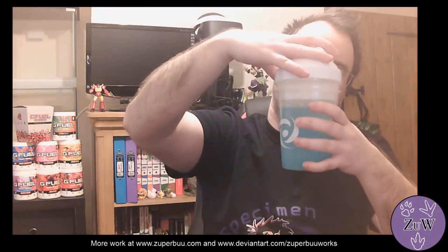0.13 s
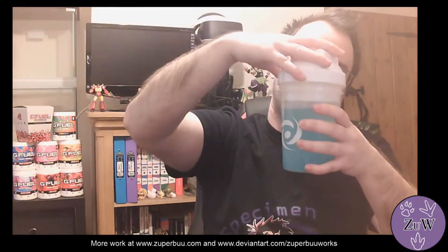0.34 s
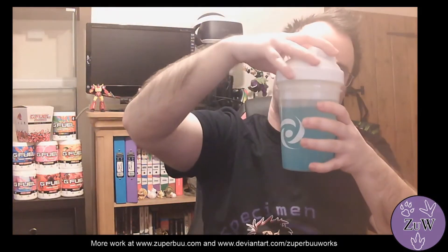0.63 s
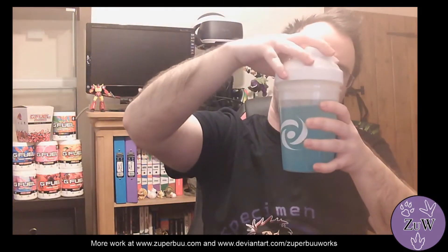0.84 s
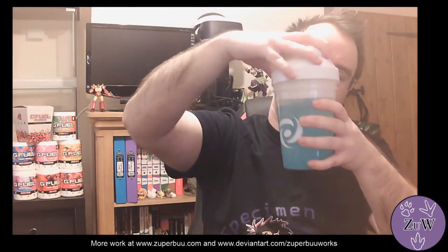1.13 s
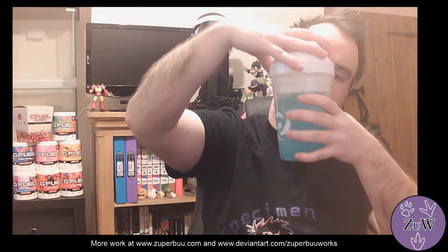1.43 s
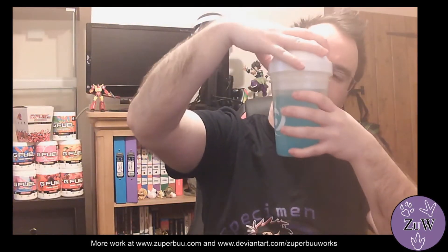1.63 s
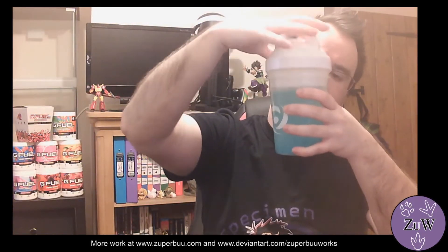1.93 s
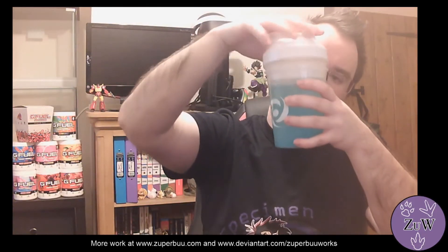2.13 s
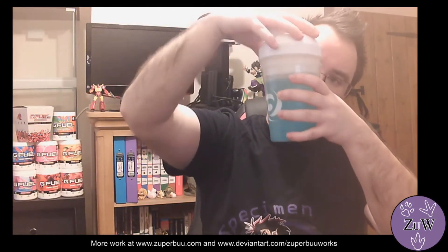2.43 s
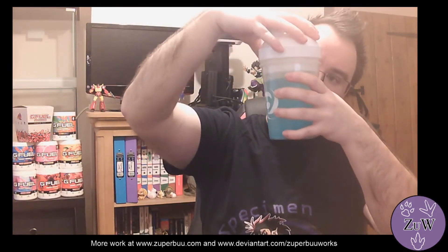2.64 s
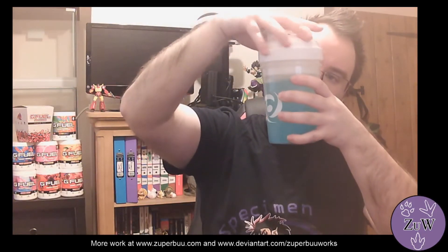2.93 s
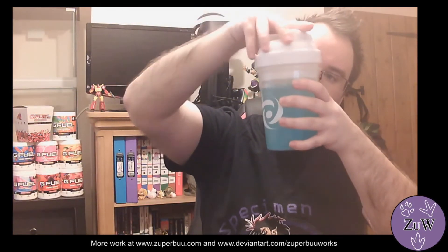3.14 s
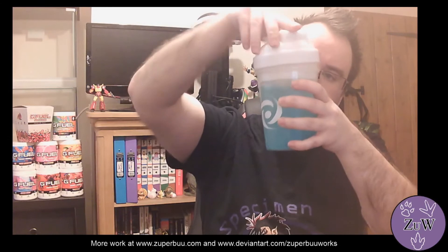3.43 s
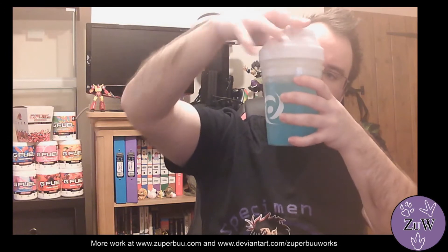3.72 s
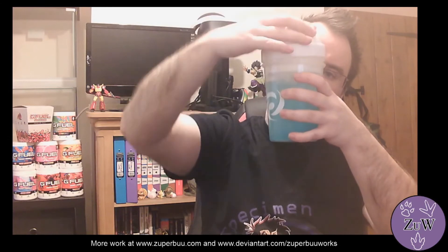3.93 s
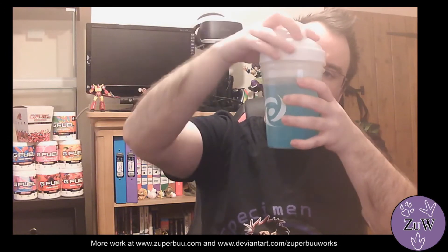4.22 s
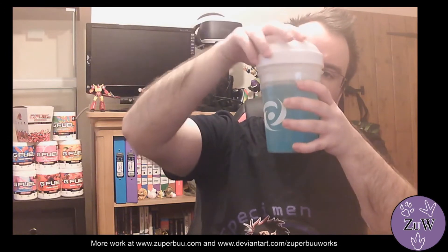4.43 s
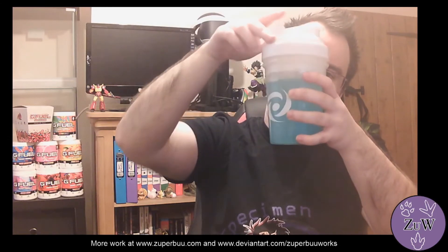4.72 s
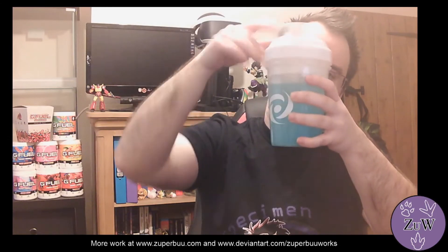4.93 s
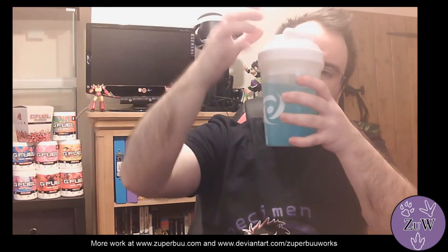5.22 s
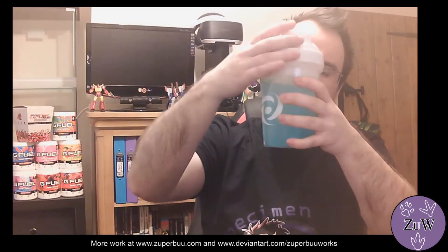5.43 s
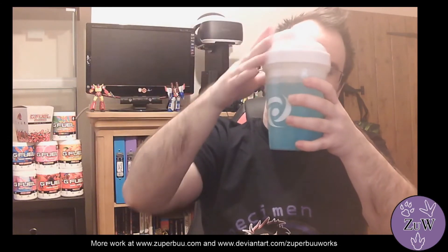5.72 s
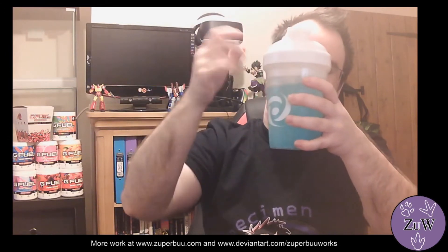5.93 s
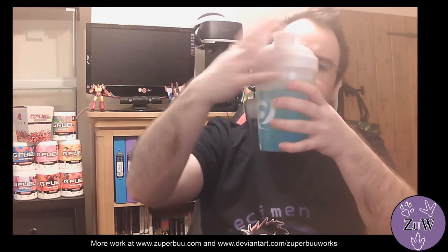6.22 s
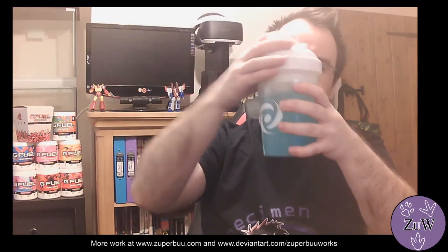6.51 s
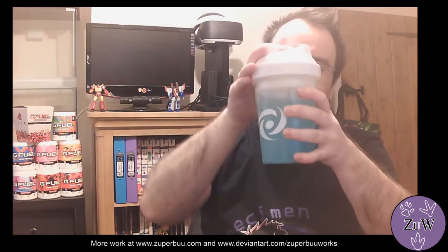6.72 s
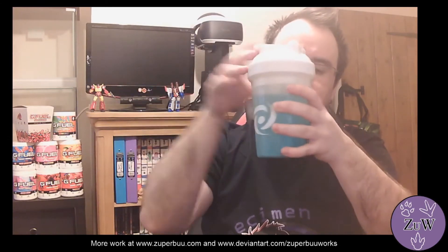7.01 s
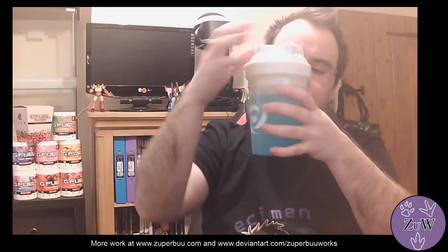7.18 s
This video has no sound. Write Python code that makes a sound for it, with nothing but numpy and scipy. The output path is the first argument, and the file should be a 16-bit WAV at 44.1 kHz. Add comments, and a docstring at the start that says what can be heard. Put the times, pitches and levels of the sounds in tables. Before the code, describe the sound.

Fingers press, tap and rub the lid of a filled plastic shaker cup, giving muffled hollow knocks and short rasps over a low pulsing hum.

```python
"""A hand presses, taps and rubs the lid of a filled plastic shaker cup held up in a small room.
From the start, knocks ring the cup's resonances and die away in the room, over a low hum of short tone
swells, soft tones, wavering resonant noise, a rumble and a faint rustle of the grip. A few fine ticks fall
early, midway and near the end; from about 2 s fingers rasp by stick-slip clicks, with thin squeaks of narrow
noise at 5 and 5.8 s. Most of it is muffled, with a thin sheen near 10 kHz on knocks and rubs."""
import sys
import numpy as np
from scipy import signal
from scipy.fft import rfft, irfft
from scipy.io import wavfile
from scipy.ndimage import uniform_filter1d

SR = 44100
rng = np.random.default_rng(int(sys.argv[2]) if len(sys.argv) > 2 else 0)


def int16_out(signal):
    """Quantize to a 16-bit WAV file."""
    q = np.round(np.clip(np.atleast_2d(signal).T, -1, 1) * 32767)
    wavfile.write(sys.argv[1], SR, q.astype(np.int16))


N = 324135
TIME = np.arange(N) / SR

# resonances of cup and lid: f/Hz, width/Hz, nominal level/dB
SHELL = [(97, 42, 4), (249, 100, 4), (345, 55, -12.5), (665, 22, 0.5), (713, 22, -9), (710, 110, 3),
         (797, 220, -3.5), (956.5, 130, 4.5), (979, 240, 2), (1204, 23, 0.5), (1080, 67, -5.5),
         (1262, 34, 0), (1399, 130, 2), (1658, 73, -5.5), (1610, 53, -8), (1960, 170, 2),
         (2300, 370, -12.5), (2230, 21, -7.5), (2710, 210, -11.5), (3130, 220, -11.5), (3280, 170, -13.5),
         (3410, 140, -13.5), (3660, 300, -13.5), (4100, 47, -23), (4200, 41, -18.5), (4360, 300, -19.5),
         (4830, 120, -22), (9800, 46, -16), (9500, 87, -25), (10126, 150, -17.5), (9990, 380, -16.5)]
# swells of the low hum: start t/s, length/s, level before gain/dB, mean f/Hz
SWELLS = [(0.044, 0.051, -44, 191.8), (0.122, 0.06, -40.5, 196), (0.234, 0.033, -43, 216.6),
          (0.278, 0.038, -37.5, 200), (0.526, 0.071, -48, 198.9), (0.626, 0.054, -37.5, 196.8),
          (0.856, 0.056, -38, 200.6), (0.908, 0.04, -38.5, 201.8), (0.951, 0.052, -38.5, 204.3),
          (1.011, 0.052, -46.5, 196.9), (1.122, 0.084, -44.5, 202.8), (1.204, 0.051, -50, 208),
          (1.345, 0.043, -47.5, 195.5), (1.373, 0.035, -48, 196.5), (1.463, 0.048, -53.5, 200.4),
          (1.524, 0.064, -40.5, 210.2), (1.876, 0.033, -41, 231.2), (1.971, 0.041, -50.5, 202.9),
          (2.007, 0.041, -40.5, 191.4), (2.045, 0.058, -46, 199.2), (2.28, 0.051, -35, 192.5),
          (2.4, 0.038, -39, 212.1), (2.428, 0.039, -35, 186.8), (2.504, 0.039, -33.5, 207.4),
          (2.542, 0.034, -39, 217.2), (2.594, 0.097, -35.5, 194.8), (2.845, 0.043, -47, 204.4),
          (2.88, 0.035, -37.5, 200.2), (2.94, 0.056, -40, 193.2), (2.995, 0.035, -46, 221),
          (3.065, 0.053, -33, 201.2), (3.105, 0.049, -37.5, 197.4), (3.165, 0.028, -38.5, 181),
          (3.29, 0.05, -38, 192.2), (3.378, 0.031, -40.5, 194.7), (3.439, 0.035, -39, 195),
          (3.626, 0.092, -36, 191.3), (3.725, 0.039, -44, 189.7), (3.8, 0.079, -43, 193),
          (3.865, 0.06, -40.5, 197.6), (3.915, 0.034, -47.5, 238.8), (3.937, 0.065, -52, 236),
          (4.04, 0.055, -38.5, 191), (4.153, 0.046, -40, 192.7), (4.173, 0.051, -38.5, 189.9),
          (4.217, 0.063, -39, 192.4), (4.275, 0.059, -39.5, 196.9), (4.358, 0.11, -35.5, 198.6),
          (4.419, 0.067, -37, 199), (4.487, 0.061, -50, 201.2), (4.578, 0.027, -45.5, 191.6),
          (4.613, 0.035, -39.5, 207.5), (4.641, 0.087, -48, 198.3), (4.728, 0.054, -46, 193.2),
          (4.806, 0.054, -53, 214.2), (4.88, 0.044, -48.5, 198.5), (4.922, 0.04, -51, 216),
          (4.979, 0.046, -45.5, 198.9), (5.077, 0.033, -37, 199.4), (5.093, 0.039, -46.5, 202),
          (5.153, 0.038, -38.5, 195.5), (5.178, 0.054, -48.5, 217.6), (5.35, 0.046, -41, 199),
          (5.392, 0.057, -37, 200.2), (5.445, 0.04, -48, 190), (5.706, 0.076, -47, 192.6),
          (5.768, 0.038, -39.5, 197.6), (5.81, 0.033, -40, 224.7), (5.84, 0.04, -45, 191.6),
          (5.862, 0.046, -51.5, 195.6), (5.929, 0.079, -39.5, 199.1), (6.074, 0.037, -41, 193.9),
          (6.156, 0.087, -39, 196.4), (6.226, 0.068, -39, 206.2), (6.301, 0.073, -48, 207.8),
          (6.361, 0.043, -36.5, 197.7), (6.617, 0.063, -50.5, 188.3), (6.703, 0.054, -40.0, 194.1),
          (6.74, 0.037, -44, 198.3), (6.832, 0.103, -38, 198.1), (6.935, 0.048, -50, 203.6),
          (6.969, 0.041, -43.5, 204.2), (7.028, 0.062, -45, 194)]


def from_db(db):
    """Amplitude ratio of a level in dB."""
    return 10 ** (np.asarray(db) / 20)


def rms_one(x):
    """Scaled to rms 1."""
    return x / np.sqrt(np.mean(x ** 2) + 1e-30)


def running_rms(x, span_s):
    """Rms in a sliding window."""
    power = uniform_filter1d(x ** 2, max(int(span_s * SR), 1), mode="constant")
    return np.sqrt(np.maximum(power, 1e-24))


def peak_one(x, span_s=0.0021):
    """Scaled so that its loudest moment has rms 1."""
    return x / running_rms(x, span_s).max()


def in_time(rows):
    """Level columns joined by straight lines in dB, as gains."""
    s, *columns = np.transpose(rows)
    return [from_db(np.interp(TIME, s, column)) for column in columns]


def add(out, s, x):
    """Mix x in at time s."""
    i = max(round(s * SR), 0)
    out[i:i + len(x)] += x[:N - i]


def band(x, low_hz, high_hz, order=4):
    """Butterworth band-pass."""
    return signal.sosfilt(signal.butter(order, [low_hz, high_hz], "band", fs=SR, output="sos"), x + 1e-18)


def muffled(x, top_hz):
    """Steep low-pass."""
    return signal.sosfilt(signal.butter(16, top_hz, fs=SR, output="sos"), x)


def emphasised(x, hz, db, octaves=0.48):
    """Peaking filter: one band raised or lowered."""
    half, w = from_db(db / 2), 2 * np.pi * hz / SR
    width = np.sin(w) * np.sinh(np.log(2) / 2 * octaves)
    zeros = [1 + width * half, -2 * np.cos(w), 1 - width * half]
    poles = [1 + width / half, -2 * np.cos(w), 1 - width / half]
    return signal.lfilter(zeros, poles, x)


def resonate(x, peaks):
    """Parallel two-pole resonances with alternating signs."""
    out = 0
    for k, (hz, width_hz, db) in enumerate(peaks):
        r = np.exp(-np.pi * width_hz / SR)
        top = (-1) ** k * from_db(db) * (1 - r * r) / 2
        poles = [1, -2 * r * np.cos(2 * np.pi * hz / SR), r * r]
        out = out + signal.lfilter([top, 0, -top], poles, x + 1e-18)
    return out


def drift(per_s):
    """Smooth random curve of spread about 1, with per_s independent steps a second."""
    steps = signal.resample_poly(rng.standard_normal(1000), 8, 1)
    return np.interp(TIME * per_s * 8, np.arange(len(steps)), steps)


def shifting(x, peaks, flutter_db, per_s):
    """Resonances whose strengths come and go, each on its own."""
    out = 0
    for k, peak in enumerate(peaks):
        out = out + (-1) ** k * resonate(x, [peak]) * from_db(flutter_db * drift(per_s))
    return out


def coloured(spectrum, size=N):
    """Noise with the given spectrum, rms 1."""
    hz, db = np.transpose(spectrum)
    bins = np.maximum(np.fft.rfftfreq(size, 1 / SR), 1)
    gain = from_db(np.interp(np.log(bins), np.log(hz), db))
    return rms_one(irfft(rfft(rng.standard_normal(size)) * gain, size))


def grainy(per_s, spread_db, smooth):
    """Random clicks of either sign and uneven strength over smooth noise."""
    happens = rng.random(N) < per_s / SR
    strength = from_db(spread_db * np.minimum(rng.exponential(1, N), 4))
    return happens * rng.choice([-1, 1], N) * strength + smooth * rng.standard_normal(N)


def fading(t60, tail_db, room_t60, size):
    """Decay at the contact joined by that of the room."""
    t = TIME[:size]
    return np.hypot(from_db(-60 * t / t60), from_db(tail_db - 60 * t / room_t60))


def knocks(uneven_db=2.0, size=24000):
    """Dry snap at the contact, then the shell rings into the room; each contact favours its own resonances."""
    # hand and lid on the cup: t/s, strength/dB, weight/dB, depth/dB, brightness/dB, sheen re strength/dB,
    # hardness/dB, favoured f/Hz, grip band f/Hz, grip band gain/dB, top f/Hz of all but the sheen
    contacts = [(0.027, -33.5, -11, -20.5, 0, -37.5, 3.5, 692, 1320, 4, 3750),
                (0.137, -50, -3, -18.5, 9, -41.5, 0, 650, 2920, 9.5, 3960),
                (0.537, -63, 2, 6, -17, -44, 4, 1160, 1303, 1, 3700),
                (1.866, -45.5, 10.5, 14.5, 9, -71, 0.5, 640, 2398, -3, 4180),
                (1.917, -27, 4.5, -1.5, -0.5, -47.5, 6, 660.5, 3000, 2.5, 3770),
                (2.51, -33.5, -7, 4.5, -7, -51, 0.5, 1055, 1850, 2, 3840),
                (3.078, -51.5, -3.5, 3.5, -0.5, -53.5, -7.5, 1430, 1840, 3, 3730),
                (3.327, -42, 0, -2.5, 12, -62, -0.5, 1395, 2950, -20.5, 3850),
                (3.694, -38, -7.5, -2.5, -4.5, -42, -2.5, 937.5, 1369, -1, 3650),
                (3.925, -38.5, 1.5, 2, 19, -70, 3.5, 1127, 2856, -8, 4060),
                (4.025, -21.5, -17, 19, 13, -35, 8, 933, 3050, 5, 4900),
                (4.036, -34, -14, 5, 7.5, -40, 1, 1407, 3050, 0.5, 4860),
                (4.093, -26, -21.5, -10, -14.5, -55.5, 7.5, 1036, 1000, -2, 4100),
                (4.91, -42, -25, 7, 0.5, -36.5, 2, 1425, 1408, 8, 3900),
                (4.925, -38.5, -16, -7, 5.5, -28, -2.5, 1320, 2650, 6.5, 4030),
                (4.943, -46.5, -16.5, -7.5, 8.5, -30, 2.5, 1400, 3650, 10, 4300),
                (4.949, -46, -4.5, -6.5, -4.5, -30, -2, 753, 1947, 7.5, 4670),
                (5.038, -41.5, -7.5, -4.5, 3.5, -33.5, -5.5, 1360, 3589, 0, 3790),
                (5.088, -34.5, -7, -8, -5.5, -24, 5.5, 568.3, 2700, 3.5, 3900),
                (5.104, -39, -2.5, -13, -1.5, -36, 10, 563, 1875, 0, 3800),
                (5.177, -48, -5, 7, -17.5, -57, 5.5, 1185, 1893, -13.5, 3700),
                (5.353, -34.5, -4, 1.5, 1, -61.5, 0, 1162, 2150, -4, 3700),
                (5.63, -52, -6, -2, -14, -31, 2, 1024, 1900, -5, 3600),
                (5.785, -48.5, -7, -6, 19.5, -21, -10, 1159, 1770, -4, 4012),
                (5.816, -31, -14, -1, 5, -13.5, 5.5, 1050, 1800, -9.5, 4000),
                (5.841, -39.5, -4, -2, 8, -23, 4, 1042, 1780, -3.5, 4070),
                (5.858, -45, 3, -5.5, -10.5, -21, 5, 1058, 1890, -0.5, 3910),
                (6.252, -39, -3, -1.5, 2.5, -61, -11, 976.3, 3000, 4, 3712)]
    # registers bump, thud, hollow, wall, edge, sheen: low f/Hz, high f/Hz, gain/dB,
    # snap before hardness/dB, contact t60/s, room tail/dB, room t60/s
    registers = [(51, 150, 3, -12, 0.09, -19, 0.25), (210, 397, -2.5, -14, 0.27, -8.5, 0.16),
                 (500, 684, -4, -2.5, 0.012, -11, 0.26), (806, 1442, -4, -3, 0.12, -8.5, 0.4),
                 (2300, 3840, -5, -9, 0.13, -8.5, 0.3), (9840, 10900, -2.5, -9, 0.11, -16.5, 0.25)]
    # spread over the registers below the sheen: level re strength/dB,
    # shares of weight, depth, brightness and softness (dB per dB)
    register_shares = [(-23, 0.13, 0.42, 0.24, 1.8), (-6.5, 0.92, 0.43, 0.016, 0),
                       (-7, 1, -0.95, 0.067, 0.26), (-1.5, 0.13, 0.059, 0.061, 0),
                       (-24.5, 0.02, -0.31, 0.73, 0.37)]
    bright_tilt = 0.58   # dB an octave for each dB of brightness
    favour_db, favour_octaves = 8, 0.13
    out, push = np.zeros(N), signal.unit_impulse(size)
    for (s, strength_db, weight_db, depth_db, bright_db, sheen_db, hardness_db,
         favoured_hz, grip_hz, grip_db, top_hz) in contacts:
        shares_db = np.array(register_shares) @ [1, weight_db, depth_db, bright_db, -hardness_db]
        levels_db = strength_db + np.append(shares_db, sheen_db)
        struck = []
        for hz, width_hz, db in SHELL:
            tilt_db = bright_tilt * bright_db * np.log2(hz / 1000)
            near_db = favour_db * np.exp(-(np.log2(hz / favoured_hz) / favour_octaves) ** 2)
            struck.append((hz, width_hz, db + tilt_db + near_db + uneven_db * rng.standard_normal()))
        shell, parts = resonate(push[:size // 4], struck), []
        for level_db, (low_hz, high_hz, gain_db, snap_db, t60, tail_db, room_t60) in zip(levels_db, registers):
            chatter = rng.standard_normal(size) * fading(t60, tail_db, room_t60, size)
            ring = peak_one(band(signal.fftconvolve(chatter, shell)[:size], low_hz, high_hz, order=3))
            snap = from_db(snap_db + hardness_db) * peak_one(band(push, low_hz, high_hz, order=3))
            parts.append(from_db(level_db + gain_db) * peak_one(ring + snap))
        *body, sheen = parts
        body = muffled(emphasised(sum(body), grip_hz, grip_db), top_hz)
        add(out, s, body + band(sheen, 9400, 11000))
    return out


def stroke(s, rise_s, hold_s, release_s, level_db):
    """Rise, hold and release; rise_s and release_s each span 20 dB."""
    away = np.maximum(s - TIME, 0) / rise_s + np.maximum(TIME - s - hold_s, 0) / release_s
    return from_db(level_db - 20 * np.minimum(away, 10))


def rub_pressure():
    """How hard the strokes drive the wall, the edge, the rim's squeal and the sheen."""
    # fingers on the lid: full pressure t/s, rise/s, hold/s, release/s, level before gain/dB,
    # edge re level/dB, squeal re level/dB, sheen re level/dB
    rub_strokes = [(2.171, 0.03, 0.015, 0.075, -60, -25, -40, -41.5),
                   (2.427, 0.031, 0.05, 0.063, -61, -25, -34, -31.5),
                   (2.856, 0.039, 0.081, 0.15, -60, -11.5, -21, -18.5),
                   (3.092, 0.046, 0.054, 0.23, -61.5, -32, -28.5, -50),
                   (3.651, 0.0099, 0.0028, 0.066, -76.5, -25.5, -27.5, 0.5),
                   (3.69, 0.008, 0.003, 0.021, -37.5, -24, -38.5, -40),
                   (4.233, 0.06, 0.091, 0.13, -62.5, -21.5, -31, -36),
                   (4.628, 0.018, 0.0082, 0.2, -50, -22, -37.5, -53),
                   (4.822, 0.028, 0.072, 0.073, -66, -13, -27, -42),
                   (4.917, 0.031, 0.038, 0.11, -41, -16, -26.5, -18),
                   (5.023, 0.017, 0.023, 0.1, -49.5, -20, -14.5, -16.5),
                   (5.352, 0.0041, 0.004, 0.03, -48.5, -16.5, -19, -53.5),
                   (5.62, 0.053, 0.036, 0.08, -66.5, -15, -18.5, -9),
                   (5.72, 0.019, 0.042, 0.078, -63, -15, -11, -12),
                   (5.782, 0.013, 0.044, 0.045, -49.5, -6, -9.5, -8.5),
                   (5.829, 0.0078, 0.012, 0.052, -42, -14.5, -39, -18),
                   (6.246, 0.0046, 0.0059, 0.03, -49.5, -14, -19.5, -49.5),
                   (6.565, 0.15, 0.028, 0.12, -61.5, -13.5, -17.5, -20),
                   (6.89, 0.031, 0.03, 0.07, -68.5, -17, -24.5, -39.5)]
    pressure = 0
    for *shape, edge_db, squeal_db, sheen_db in rub_strokes:
        pressure = pressure + from_db([[0], [edge_db], [squeal_db], [sheen_db]]) * stroke(*shape)
    return pressure


def rubs(pressure, stutter_db=0.03, steady_s=0.095):
    """Skin sticks and slips: dense uneven clicks drive the upper resonances, while the rim hisses evenly."""
    # gains of wall, edge, squeal, sheen: level/dB
    register_gains_db = [-8, -7.5, -7.5, -5.5]
    # squeal of the lid's rim under the skin: f/Hz, width/Hz, level/dB
    rim_peaks = [(3500, 180, -3), (3690, 90, -5)]
    # thin squeaks of skin on the lid: full t/s, rise/s, hold/s, release/s, level/dB
    squeak_strokes = [(4.95, 0.04, 0.017, 0.07, -92), (5.839, 0.043, 0.0069, 0.081, -78)]
    # resonances of the squeaks: f/Hz, width/Hz, level/dB
    squeak_peaks = [(4758, 130, 7.5), (4420, 120, -1)]
    friction = grainy(per_s=700, spread_db=3.0, smooth=0.2)
    shell = shifting(friction, SHELL[5:], flutter_db=6.0, per_s=29)
    wall = band(shell, 800, 1750)
    edge = band(shell, 2000, 3100, order=7)
    squeal = band(resonate(rng.standard_normal(N), rim_peaks), 2700, 3900)
    sheen = band(shell, 9700, 10900)
    rasp = 0
    for level, gain_db, x in zip(pressure, register_gains_db, [wall, edge, squeal, sheen]):
        rasp = rasp + level * from_db(gain_db) * x / running_rms(x, steady_s)
    squeak = rms_one(band(resonate(rng.standard_normal(N), squeak_peaks), 3900, 4950))
    stutter = from_db(stutter_db * drift(110))   # the finger catches and lets go, very slightly
    return rasp * stutter + sum(stroke(*row) for row in squeak_strokes) * squeak


def ticks(gain_db=-1, size=12000):
    """Tiny bright snaps of the plastic ring briefly, each at its own pitch, with a short room tail."""
    # fine ticks: t/s, peak before gain/dB, pitch ratio, tilt/dB an octave
    snaps = [(0.8988, -61.5, 1.02, -1.5), (1.066, -69.5, 1.06, -6.5), (3.458, -77.5, 0.98, -7),
             (4.341, -60, 1.24, -5), (4.367, -60.5, 1.19, -1), (4.3827, -63, 0.96, 0),
             (7.168, -72, 1.14, -4), (7.189, -70, 0.91, -3)]
    # resonances of the ticks: f/Hz at ratio 1, width/Hz, level before tilt/dB
    tick_peaks = [(1610, 95, 14.5), (2387, 100, 15.5), (2840, 70, 10.5), (3560, 93, 5.5), (4030, 270, -1),
                  (5260, 70, 1), (5830, 70, -4.5), (6740, 99, -9.5), (7400, 120, -15)]
    out = np.zeros(N)
    for s, peak_db, pitch, tilt_db in snaps:
        peaks = [(hz * pitch, width_hz, db + tilt_db * np.log2(hz / 3000)) for hz, width_hz, db in tick_peaks]
        tail = from_db(-18.5) * rng.standard_normal(size) * fading(0.028, -12.5, 0.23, size)
        ring = band(resonate(signal.unit_impulse(size) + tail, peaks), 1400, 7800, order=7)
        add(out, s, from_db(peak_db + gain_db) * peak_one(ring, span_s=0.0016))
    return out


def swelling_tone(gain_db, wander_hz, flutter_db=1.0, flutter_per_s=55):
    """One tone rises, holds unsteadily and fades in bursts, its pitch sliding from each to the next."""
    attack_s, release_s = 0.0068, 0.0063
    delay_s, early_s = 0.009, 0.01   # half strength this long after the start and before the end
    start, length, db, hz = np.transpose(SWELLS)
    since = TIME[::40] - start[:, None]
    rise = (1 + np.tanh((since - delay_s) / attack_s)) / 2
    fall = (1 + np.tanh((length[:, None] - early_s - since) / release_s)) / 2
    shape = np.interp(TIME, TIME[::40], (from_db(db)[:, None] * rise * fall).max(axis=0))
    wander = wander_hz * rms_one(band(rng.standard_normal(N), 2.7, 67, order=2))
    pitch = np.interp(TIME, start + length / 2, hz) + wander
    level = shape * from_db(gain_db + flutter_db * drift(flutter_per_s))
    return level * np.sin(2 * np.pi * np.cumsum(pitch) / SR)


def faint_tones():
    """One faint tone after the middle of each swell of the hum, as rows like those of the clear ones."""
    # pitches they cluster at: f/Hz
    faint_hz = [538, 545, 600, 640, 983, 1054, 1190, 1136]
    mean_db, spread_db, half_s, detune, scatter_s = -68.5, 3, 0.0087, 0.0058, 0.03
    spread = rng.standard_normal((len(SWELLS), 4))
    pick = rng.choice(len(faint_hz), len(SWELLS))
    start, length, _, _ = np.transpose(SWELLS)
    s = np.clip(start + length / 2 + scatter_s * np.abs(spread[:, 3]), 0, TIME[-1])
    hz = np.array(faint_hz)[pick] * (1 + detune * spread[:, 0])
    return list(zip(s, mean_db + spread_db * spread[:, 1], half_s * 2 ** (spread[:, 2] / 2), hz))


def soft_tones(wander_hz=14.8, size=8000):
    """Short rounded tones of unsteady pitch that rise and fade alike."""
    # the clearest tones above the hum: t/s, peak/dB, half length/s, mean f/Hz
    clear_tones = [(0.006, -40, 0.012, 624), (0.54, -57.5, 0.0042, 1104), (0.873, -56, 0.017, 539),
                   (0.998, -50.5, 0.011, 528), (1.176, -55, 0.028, 526), (1.129, -54, 0.0099, 537),
                   (1.363, -50.5, 0.0074, 646), (1.5, -55, 0.0065, 678), (1.595, -59, 0.019, 646),
                   (2.104, -45.5, 0.0028, 1135), (2.179, -56, 0.018, 1091), (2.451, -51.5, 0.0077, 622.5),
                   (2.582, -51, 0.0057, 976), (2.678, -53, 0.015, 541), (3.09, -55, 0.0084, 1390),
                   (3.204, -58, 0.0069, 1087), (3.767, -53, 0.017, 1192), (4.375, -56, 0.027, 536),
                   (4.46, -56.5, 0.021, 538), (4.708, -49, 0.011, 643.4), (4.759, -46, 0.006, 636.7),
                   (4.862, -51, 0.0057, 1047), (5.187, -50.5, 0.011, 1183), (5.206, -53.5, 0.015, 538),
                   (5.451, -49, 0.0045, 541), (5.934, -61, 0.013, 1055), (6.088, -54, 0.0047, 646),
                   (6.563, -48.5, 0.0059, 1049), (7.001, -53, 0.0073, 532.4), (7.24, -50, 0.0065, 543)]
    out, t = np.zeros(N), TIME[:size] - TIME[size // 2]
    wander = wander_hz * drift(60)
    for k, (s, db, half_length_s, hz) in enumerate(list(clear_tones) + faint_tones()):
        shape = 1 / np.cosh(np.sqrt(2) * t / half_length_s)
        pitch = hz + np.roll(wander, k * size)[:size]
        tone = shape * np.sin(2 * np.pi * np.cumsum(pitch) / SR)
        add(out, s + t[0], from_db(db) * tone[s + t >= 0])
    return band(out, 410, 1800, order=3)


def hum_swing(hum, follow_s=0.053, lull_db=-52.5):
    """The hum's slow rise and fall, rms 1; it levels off in lulls."""
    return rms_one(running_rms(hum, follow_s) + from_db(lull_db))


def rustle(hum, follows=0.37, gain_db=-1.0, steady_s=0.098):
    """The grip shifts on the cup: faint scattered grains in a few resonances of the wall."""
    # level of the rustle: t/s, level before gain and swing/dB
    rustle_levels = [(0.55, -105), (0.7, -82), (0.78, -93.5), (1.12, -84.5), (1.25, -91), (1.6, -92),
                     (1.65, -73.5), (1.75, -96), (2.05, -82), (2.35, -88.5), (2.6, -77.5), (2.78, -85),
                     (3.05, -79.5), (3.28, -88), (3.52, -80), (3.62, -87), (4.0, -74), (4.2, -70),
                     (4.5, -75.5), (4.58, -80), (4.66, -78), (4.8, -80.5), (5.48, -83.5), (5.58, -78),
                     (5.7, -89), (6.0, -78.5), (6.15, -86.5), (6.4, -87.5), (6.92, -84.5), (7.3, -102)]
    # resonances of the wall: f/Hz, width/Hz, level/dB
    rustle_peaks = [(1544, 98, 4), (1745, 100, 0.5), (1900, 46, -3), (2180, 180, -11)]
    grains = grainy(per_s=260, spread_db=1.5, smooth=0.12)
    x = band(shifting(grains, rustle_peaks, flutter_db=6.0, per_s=25), 1300, 2600)
    level = in_time(rustle_levels)[0] * hum_swing(hum) ** follows * from_db(gain_db)
    return level * x / running_rms(x, steady_s)


def wavering(peaks, low_hz, high_hz, gain_db, flutter_db, per_s, steady_s=0.074):
    """Noise in a few narrow resonances that flutter quickly while the slow level stays even."""
    x = band(shifting(rng.standard_normal(N), peaks, flutter_db, per_s), low_hz, high_hz, order=3)
    return from_db(gain_db) * x / running_rms(x, steady_s)


def background(hum):
    """Three ranges of wavering resonances that rise and sink with the hum."""
    # levels before gain and swing: t/s, low/dB, hollow/dB, middle/dB
    range_levels = [(0.0, -48.5, -60.5, -60.5), (0.1, -58, -60, -58), (0.32, -62, -75, -77.5),
                    (0.38, -74.5, -77.5, -64), (0.5, -68.5, -86, -79), (0.58, -63.5, -67, -75),
                    (0.76, -55, -78.5, -65.5), (0.84, -55, -89, -78), (0.9, -54.5, -77.5, -71.5),
                    (1.141, -54.5, -69, -77), (1.28, -65, -74, -89), (1.34, -62, -75, -70.5),
                    (1.54, -52, -67.5, -81.5), (1.641, -53, -69, -68), (1.74, -57.5, -68, -83),
                    (1.9, -62, -77, -68.5), (1.961, -63.5, -56, -69), (2.06, -57, -84, -71),
                    (2.12, -53, -60, -59.5), (2.26, -59, -68, -70.5), (2.48, -56.5, -77.5, -67),
                    (2.64, -60.5, -81, -68.5), (2.72, -54.5, -67.5, -68.5), (2.881, -66, -85, -62),
                    (2.96, -52.5, -70, -71.5), (3.12, -59, -80.0, -69), (3.639, -61.5, -79.5, -71.5),
                    (3.7, -51, -78.5, -72), (3.799, -68, -71, -65.5), (3.86, -56.5, -78, -70.5),
                    (3.98, -54, -72, -57), (4.22, -54, -94, -78), (4.3, -53.5, -77, -64),
                    (4.56, -58, -67, -74.5), (4.9, -58.5, -82, -70), (4.98, -59, -63, -69),
                    (5.44, -59.5, -78.5, -63), (5.6, -65.5, -72.5, -71), (5.84, -55, -57, -57.5),
                    (6.02, -56.5, -75, -64.5), (6.12, -56.5, -69, -81), (6.24, -57.5, -80, -63.5),
                    (6.342, -61.5, -66.5, -74.5), (6.42, -56, -77.5, -63), (6.481, -49.5, -67, -63),
                    (6.601, -60, -66, -64), (6.881, -52.5, -76, -67), (7.08, -65.5, -72, -78),
                    (7.181, -66.5, -74, -68), (7.34, -60.5, -67.5, -77)]
    # share of the hum's swing in dB: low, hollow, middle
    swing_shares = [0.64, 0.43, 0.32]
    # resonances of the low range: f/Hz, width/Hz, level/dB
    low_peaks = [(171.3, 26, 3), (202.9, 15, 8), (220, 0.85, -1.5), (266, 32, -1.5), (300.7, 13, -3.5),
                 (344, 11, -12.5)]
    # resonances of the hollow range: f/Hz, width/Hz, level/dB
    hollow_peaks = [(399, 2.5, -11), (465, 37, -7), (534.4, 18, 4.5), (647.5, 25, 2), (704, 30, -14)]
    # resonances of the middle range: f/Hz, width/Hz, level/dB
    middle_peaks = [(805, 50, 0), (980, 8.9, -4.5), (965, 45, -6.5), (1064, 8.1, 4), (1046, 23, -5),
                    (1185, 93, -5), (1296, 6, -9), (1473, 5.5, -7.5), (1730, 68, -12), (1860, 120, -26)]
    swing = hum_swing(hum)
    low, hollow, middle = [level * swing ** share for level, share in zip(in_time(range_levels), swing_shares)]
    return (low * wavering(low_peaks, 140, 370, gain_db=3.0, flutter_db=2.5, per_s=12)
            + hollow * wavering(hollow_peaks, 270, 870, gain_db=4.0, flutter_db=9.0, per_s=18)
            + middle * wavering(middle_peaks, 880, 1520, gain_db=1.5, flutter_db=8.0, per_s=21))


def rumble(gain_db=6.0, uneven_db=3.0):
    """Deep noise of uneven level under the handling."""
    # level of the rumble: t/s, level before gain/dB
    rumble_levels = [(0.1, -69.5), (0.35, -84.5), (0.8, -85.5), (0.95, -79.5), (1.45, -71), (1.9, -81.5),
                     (2.5, -73.5), (3.25, -74), (3.55, -77), (4.05, -70), (4.87, -78), (5.02, -60.5),
                     (5.2, -81.5), (5.83, -70), (6.1, -77), (6.65, -78.5), (6.95, -71), (7.35, -97.5)]
    noise = coloured([(8, -2.0), (20, 0.0), (45, -8.5), (75, -8.5), (105, -4.5), (140, -11.0),
                      (220, -39.0), (600, -78.0)])   # f/Hz, relative level/dB
    return in_time(rumble_levels)[0] * noise * from_db(gain_db + uneven_db * drift(12))


def room_noise(room_db=-68.5, hiss_db=-99):
    """Steady coloured noise of the room plus a white hiss."""
    # spectrum of the room: f/Hz, relative level per Hz/dB
    room_spectrum = [(20, -2), (40, -10), (100, -12.5), (160, -4.5), (197, 12.5), (240, -5), (400, -13),
                     (1100, -17), (1500, -25), (2200, -38), (4000, -43), (15000, -46)]
    return from_db(room_db) * coloured(room_spectrum) + from_db(hiss_db) * rng.standard_normal(N)


def scene():
    """Handling of the cup over the hum, its background and the room."""
    hum = swelling_tone(gain_db=2.0, wander_hz=8.5)
    handling = knocks() + rubs(rub_pressure()) + ticks() + rustle(hum)
    under = hum + soft_tones() + background(hum) + rumble() + room_noise()
    return (handling + under)[None]


def record(dry, fade_s=0.0007, cutoff_hz=15800):
    """The sound eases in and its top is cut."""
    top_cut = signal.cheby2(12, 70, cutoff_hz, fs=SR, output="sos")
    return signal.sosfilt(top_cut, dry * np.minimum(TIME / fade_s, 1))


dry = scene()
out = record(dry)
int16_out(out)
```